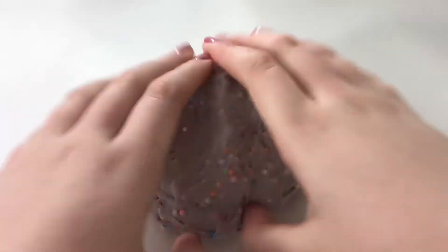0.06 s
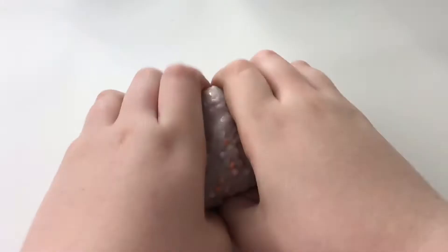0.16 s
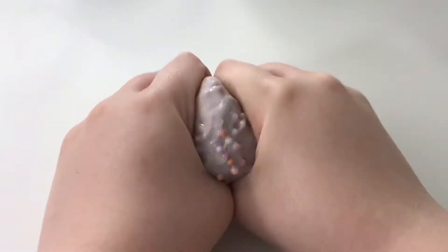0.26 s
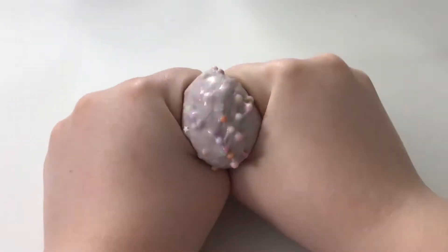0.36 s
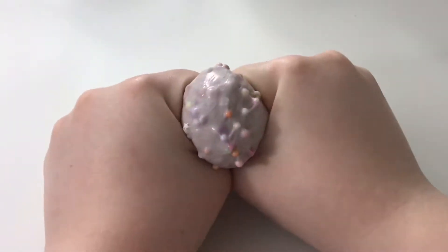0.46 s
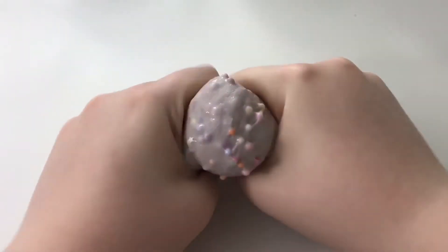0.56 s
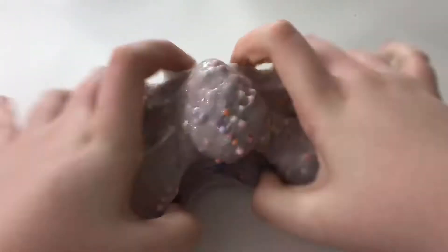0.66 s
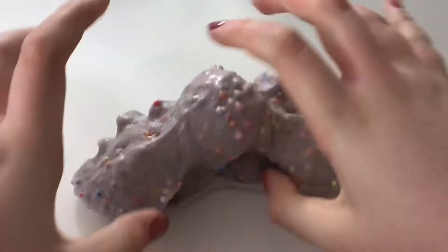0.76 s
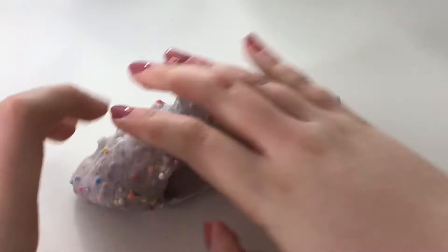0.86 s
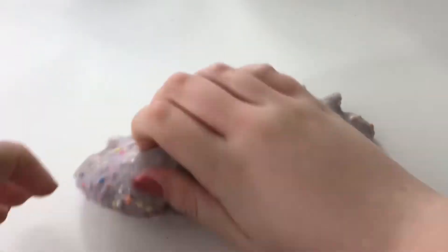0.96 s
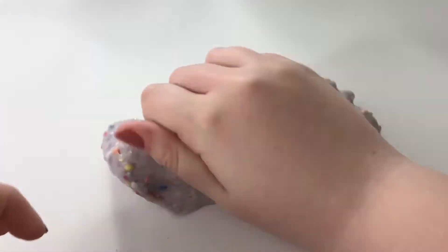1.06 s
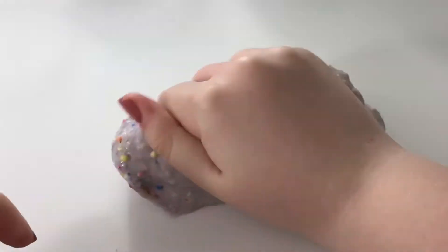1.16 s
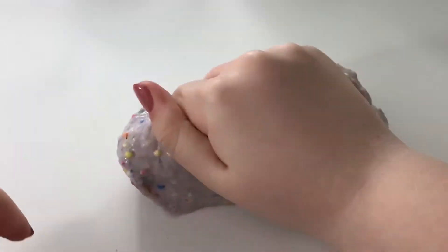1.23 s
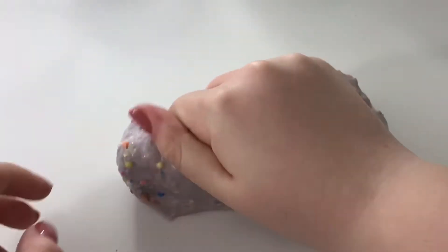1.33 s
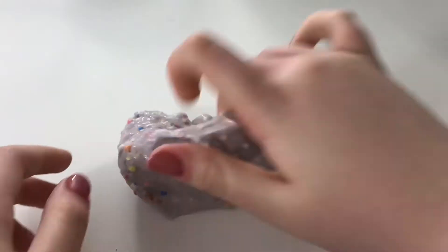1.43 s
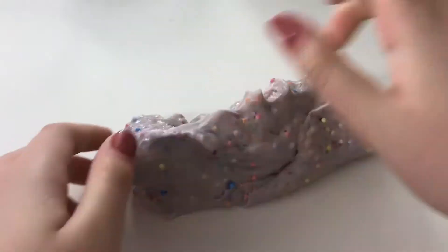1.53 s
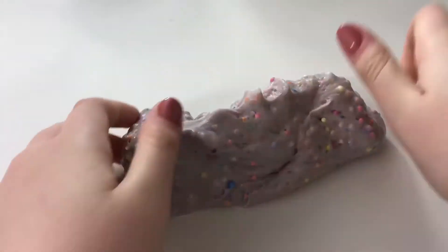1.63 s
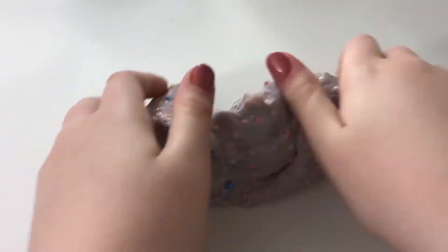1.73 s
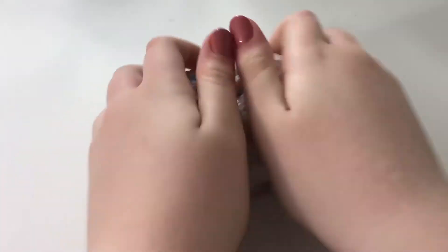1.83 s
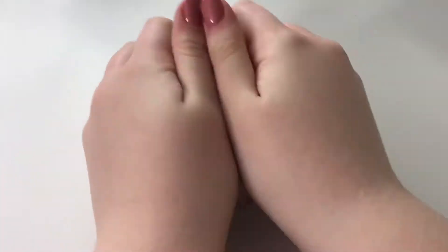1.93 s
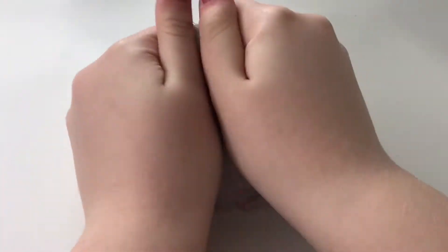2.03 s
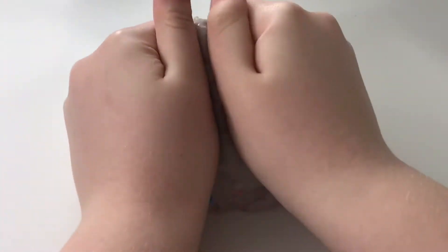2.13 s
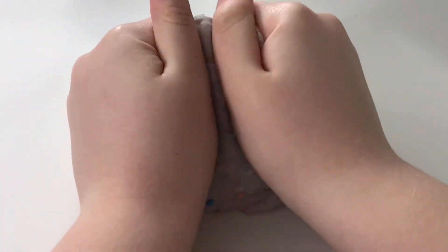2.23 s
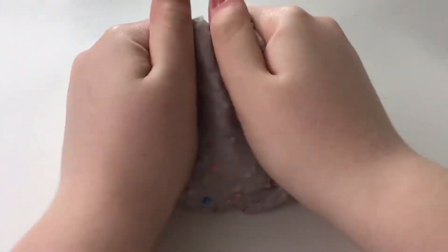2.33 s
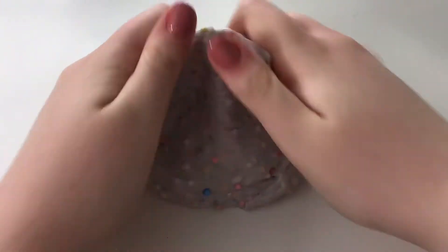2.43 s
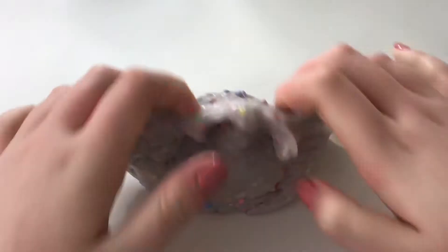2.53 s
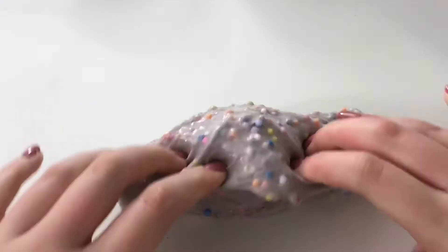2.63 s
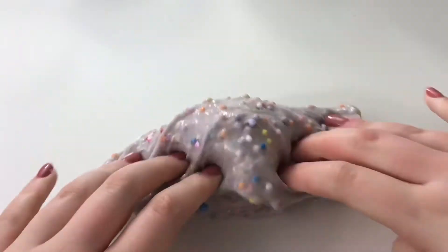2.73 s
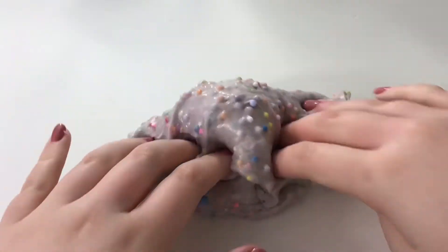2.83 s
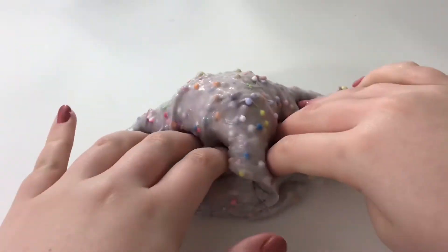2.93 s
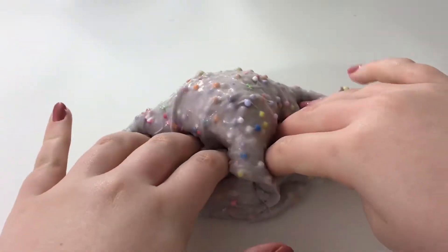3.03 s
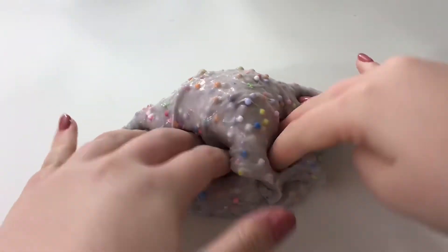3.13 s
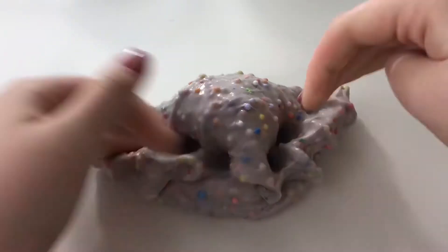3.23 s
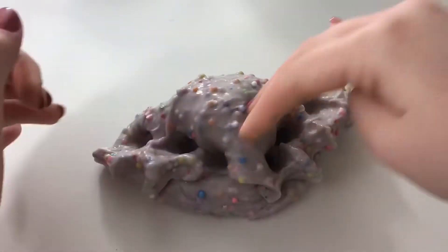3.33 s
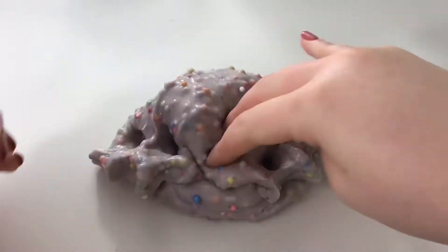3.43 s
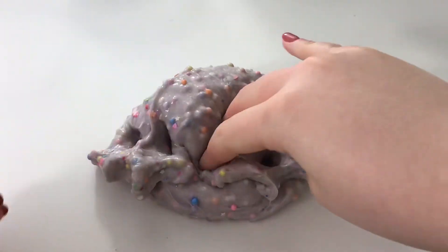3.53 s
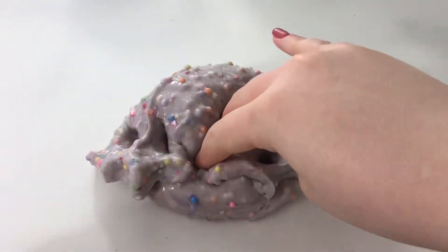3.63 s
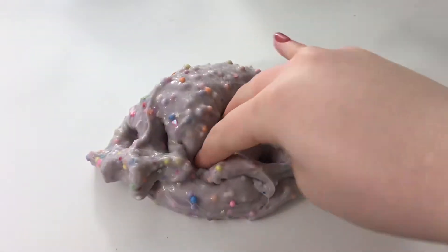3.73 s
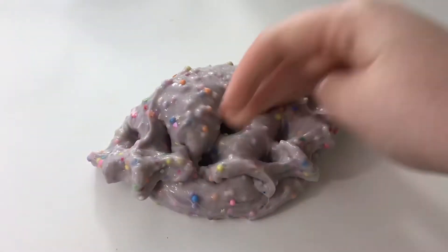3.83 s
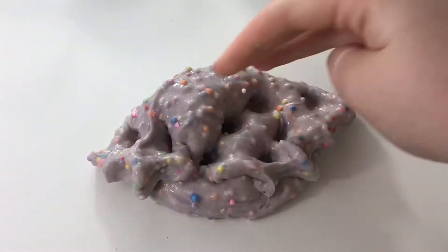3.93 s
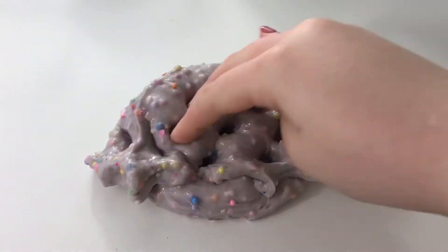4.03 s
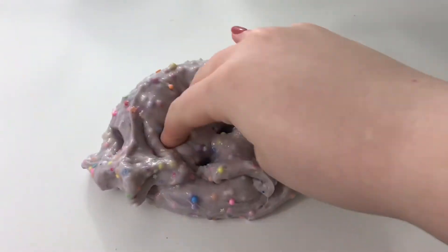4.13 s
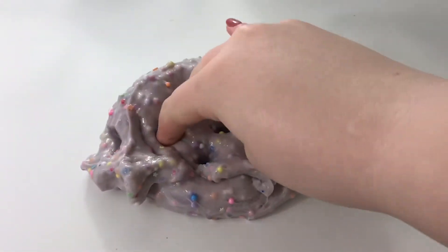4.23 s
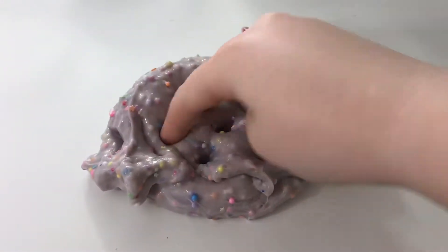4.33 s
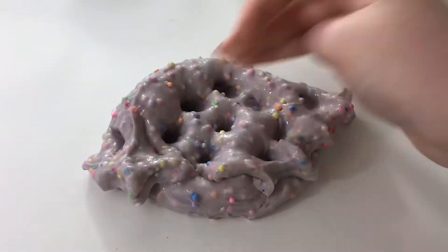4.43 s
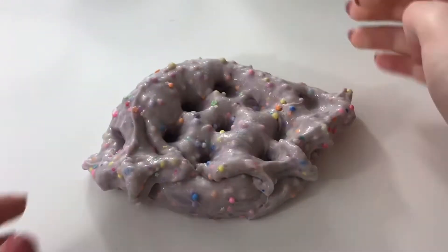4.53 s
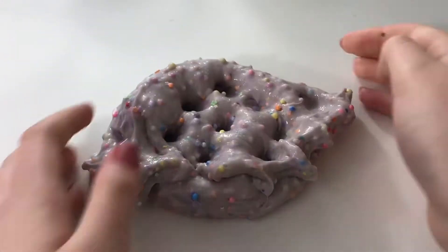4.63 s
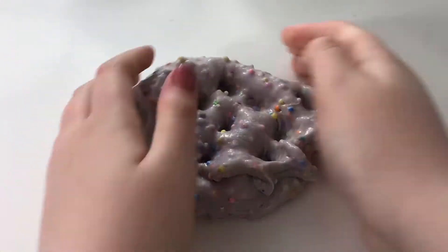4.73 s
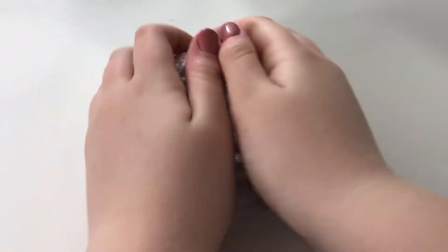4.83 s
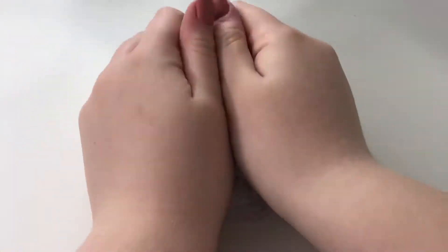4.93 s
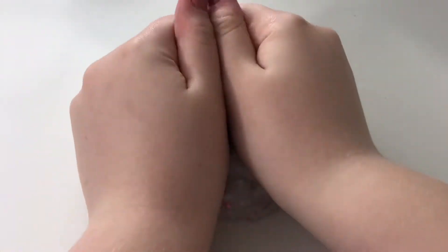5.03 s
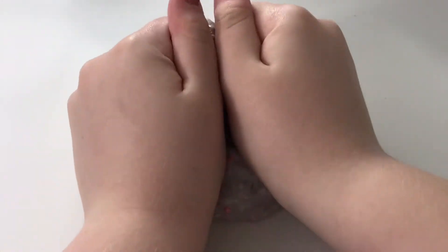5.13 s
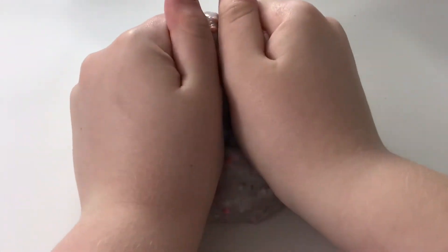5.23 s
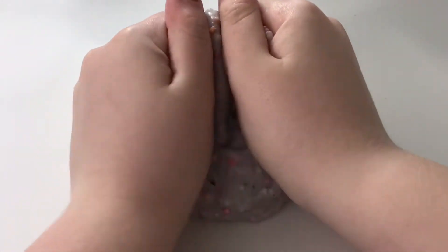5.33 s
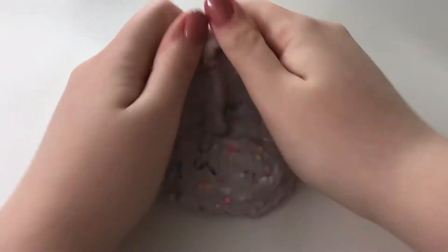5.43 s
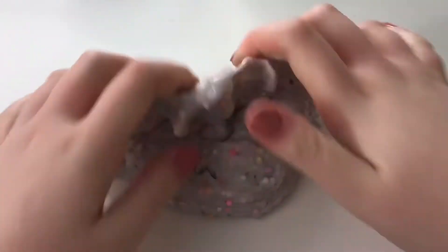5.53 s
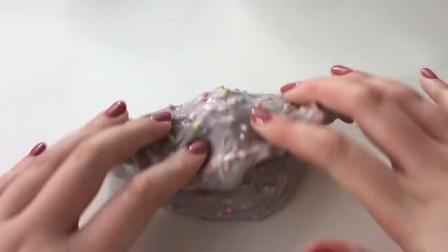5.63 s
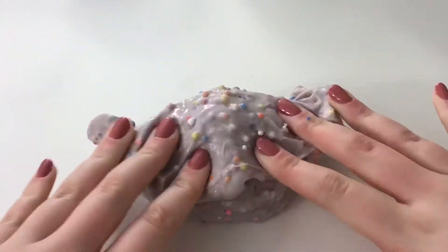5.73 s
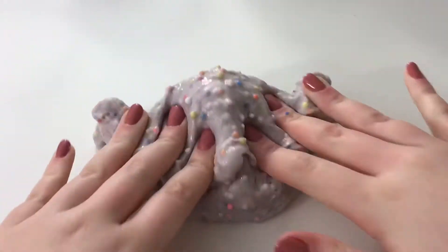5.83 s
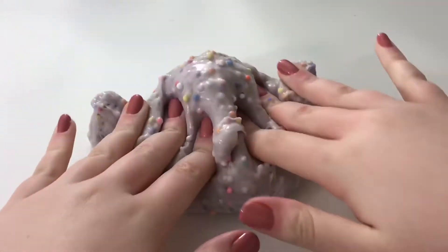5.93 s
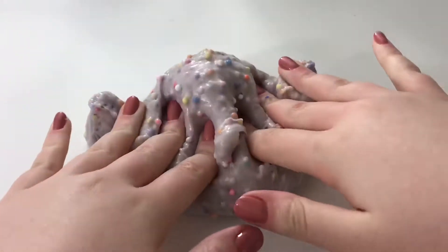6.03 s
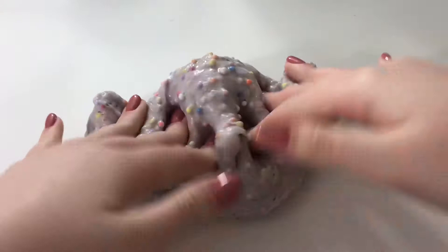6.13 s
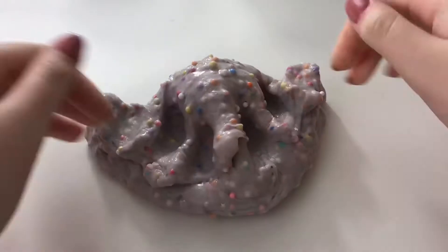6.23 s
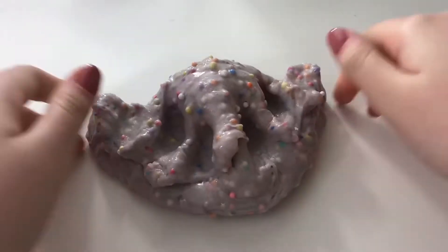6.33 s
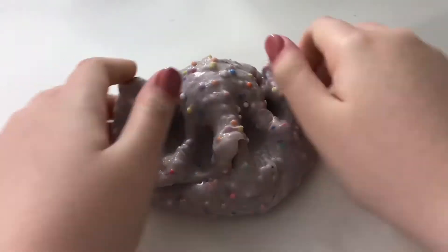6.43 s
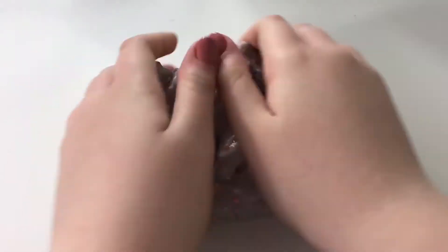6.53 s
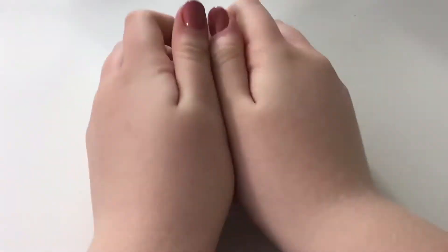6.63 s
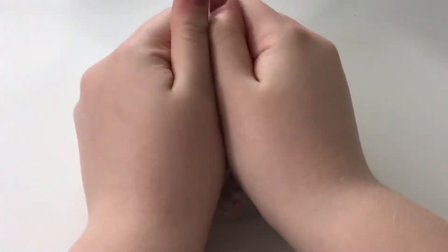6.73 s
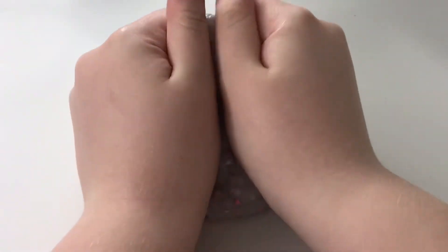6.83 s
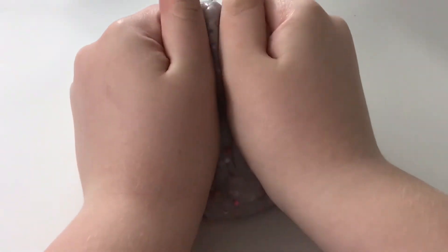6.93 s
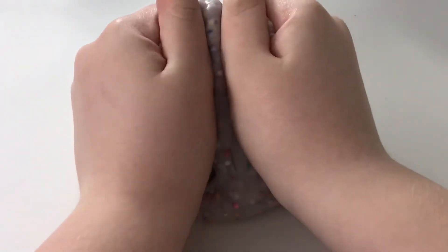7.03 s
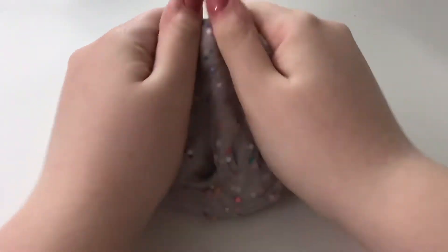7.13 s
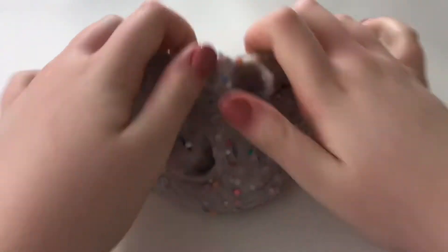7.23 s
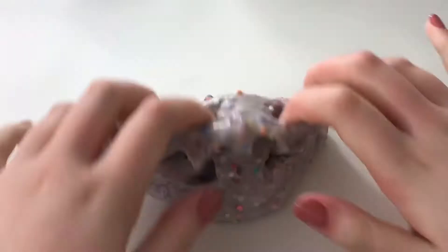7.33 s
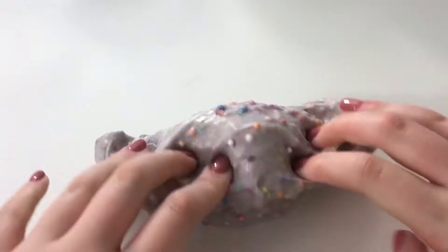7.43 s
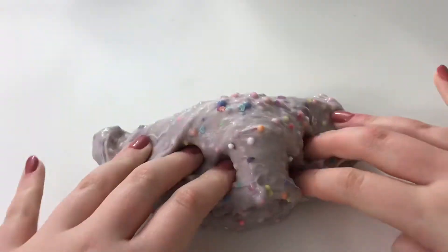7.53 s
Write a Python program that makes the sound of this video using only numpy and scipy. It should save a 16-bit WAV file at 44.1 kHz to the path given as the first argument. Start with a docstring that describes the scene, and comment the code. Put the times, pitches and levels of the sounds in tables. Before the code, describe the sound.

Very close to the microphone in a small quiet room, hands squeeze bead-filled slime. Pressure crackles build into a loud rush of snapping air pockets, followed by sticky peeling and a tiny high squeak. A second squeeze bursts, then fingers poke holes with wet clicks and short rising plops. Two more squeezes break sharply, with soft table thuds and a faint low rumble beneath.

```python
"""Hands rest in foam-bead slime on a table, close by in a small room; bubbles crackle, resonant air pockets pop.
A first squeeze soon breaks into a rush of pops, a pinhole squeaks at 1.2 s and a second squeeze breaks at 2.2 s.
Finger holes, short rising tones, plop mostly between 3.2 and 4.5 s; two more squeezes break at 5.2 and 6.9 s.
Throughout, filtered noise makes soft table thuds, rumble and hiss, a sine hums, and decaying noise echoes."""
import sys
import numpy as np
from scipy import signal
from scipy.fft import rfft, irfft, next_fast_len
from scipy.io import wavfile
from scipy.ndimage import uniform_filter1d

SR = 44100
rng = np.random.default_rng(int(sys.argv[2]) if len(sys.argv) > 2 else 0)


def output_pcm(signal):
    """Save a mono or channel-first signal as 16-bit PCM at the path in sys.argv[1].

    Samples are clipped to [-1, 1] before scaling.
    """
    pcm = np.clip(np.atleast_2d(signal).T, -1, 1) * 32767
    wavfile.write(sys.argv[1], SR, np.round(pcm).astype(np.int16))


N = 333837
T = np.arange(N) / SR

# air pockets heard bursting one by one, loud and faint: (time [s], energy before colouring [dB],
# cavity pitch [Hz], ring of the lump re cavity [dB], tearing time before the linger factor [s])
POCKET_BURSTS = [(0.1923, -23.5, 3850, 3, .002), (0.2288, -18, 3930, -2.5, .0026),
                 (0.2764, -16, 5370, -28, 0.00034), (0.3264, -13, 8000, 1, .0006),
                 (0.375, -10.5, 2800, 16, .001), (0.41, -8.5, 2920, -21, .001), (0.425, 8, 6800, -5, .0013),
                 (0.4504, -4, 14000, -21, .0004), (0.486, 2.5, 15000, -27, .0003),
                 (0.6526, -13.5, 3260, -26, .001), (0.7221, -13.5, 4490, 1.5, .0007),
                 (1.0188, -33, 2520, 7, 0.00078), (1.139, -26.5, 4240, -2, .0004),
                 (1.2615, -14.5, 3300, -29, 0.00091), (1.293, -10, 12800, -30, .001),
                 (1.4559, -20, 3540, 0, 0.0033), (1.5524, -19, 13000, -26, .0008),
                 (1.7913, -24, 3160, -8, 0.0009), (1.819, -25, 5000, 4, 0.0008),
                 (2.0988, -23, 6530, -9, 0.00066), (2.1182, -11, 8450, -13, .0015),
                 (2.1565, 5, 10500, -34.5, .0023), (2.1685, 5.5, 7000, -15, .001),
                 (2.2135, -3, 7530, -6, .0005), (2.2318, -8, 5990, -23, .0018),
                 (2.2537, -5.5, 13000, -1.5, .0016), (2.309, -16.5, 4470, 5, 0.00057),
                 (2.3404, -2.5, 5920, -4, .0026), (2.6816, -15, 8400, -24, .0009),
                 (2.849, -26.5, 11970, -16.5, .001), (2.9364, -27, 8860, -15.5, 0.0006),
                 (2.9636, -31.5, 5300, -7, 0.0004), (3.2268, -18.5, 5370, -16, .002),
                 (3.2373, -18, 4960, -19, .0004), (3.2983, -15.5, 2840, -25, .0008),
                 (3.2545, -13, 6550, -29, 0.00027), (3.273, -12.5, 6660, -28, .001),
                 (3.3105, -9.5, 5430, -19, 0.00019), (3.4437, -33, 14000, -32, .0002),
                 (3.4925, -12.5, 6700, -14.5, 0.00056), (3.6108, -27, 10040, -22.5, .0002),
                 (3.871, -6, 9800, -23, 0.00039), (3.8747, -5, 6500, -11, 0.00042),
                 (3.894, -10.5, 3230, -30, .001), (4.157, -29.5, 4700, -6, 0.00073),
                 (4.2104, -23, 11260, -17, .0001), (4.4425, -6.5, 9000, -7, 0.0014),
                 (4.4639, -9.5, 3470, -28, 0.0004), (4.4914, -19.5, 5000, 2, 0.0004),
                 (4.8367, -22, 3020, -14.5, 0.00088), (4.8603, -20.5, 4260, 0, 0.00047),
                 (5.1035, -14.5, 8100, 4, 0.00049), (5.123, -14, 2000, 1.5, .0008),
                 (5.161, 4, 4030, -3.5, .001), (5.2054, -2.6, 3870, -16, .0012),
                 (5.2337, 1.5, 11920, -21, .0003), (5.2434, -2, 5990, -0.5, .0018),
                 (5.28, 4.5, 3920, -3.5, .0015), (5.2674, -6, 11900, -14, 0.00073),
                 (5.315, 0.5, 11030, -20, .0007), (5.8605, -35, 3250, -15, 0.00055),
                 (5.9264, -22, 9500, -14, .0003), (5.972, -24.5, 11920, -22, .0003),
                 (6.0055, -25.5, 6000, -3.5, .0003), (6.203, -23.5, 5800, -25, 0.0024),
                 (6.2395, -10.5, 8800, -28, 0.00033), (6.4193, -25.5, 3660, 1.5, .0012),
                 (6.495, -25, 7500, -13, .001), (6.874, -19, 2370, 28, 0.00097),
                 (6.8963, -16, 13000, -17, 0.0013), (6.9308, -3, 4580, -6.5, .0006),
                 (6.9385, 9, 8450, -20.5, .0012), (6.9804, 1, 11920, -30, .0004),
                 (7.0333, -4.5, 12500, -29, 0.00017), (7.0707, -11, 12600, -30, 0.0013),
                 (7.1063, 3, 9850, -48, .0003), (7.178, -13, 11260, -33, .0002),
                 (7.54, -17, 3600, -1, 0.00042)]
# small bursts radiate little bass: (frequency [Hz], gain [dB])
POP_COLOUR = [(200, -13), (600, 2), (950, -8), (1350, 2.5), (2300, 1.5), (4000, 3), (9000, 0.5), (16000, 3)]
# big, low pockets ring clearly; small, high ones only click
POCKET_HZ = 4000
POCKET_Q, CLICK_Q, Q_FALL = 1.3, 1.3, 2.6  # extra Q at POCKET_HZ, least Q, how steeply the extra Q falls with pitch
MOST_Q = 5.5

# both fists squeeze until the air breaks out: (grip [s], break [s], rush length [s], strain level [dB],
# rush level [dB], fizz re rush [dB], fade [dB/s]); levels here and below are before the trims in kneading()
SQUEEZES = [(0.275, 0.423, 0.0096, -44.5, -34, 1, 162), (1.85, 2.162, 0.088, -60, -42, 6, 130),
            (4.903, 5.166, .16, -51, -43.5, -1, 122), (6.695, 6.93, 0.01, -58, -46, 9.5, 44)]
STRAIN_DB_PER_S = 39  # the crackle grows as the pressure builds
BREAK_DB_PER_S = 3997.5  # the rush starts at once
STRAIN_FIZZ_DB, SQUEEZE_SQUELCH_DB = -1, -13.5
# slime peels off fingers or table: (start [s], length [s], crackle level [dB], squelch re crackle [dB],
# fizz re crackle [dB])
PEELS = [(0, 0.014, -58, -2, -1), (0.657, 0.087, -39.5, -5, -5.5), (0.809, 0.05, -59, -2, 2),
         (1.045, 0.045, -65, -2, 8), (1.216, 0.052, -51.5, -20, 2.5), (1.442, 0.098, -44, -9, -5.5),
         (1.817, 0.043, -53.5, -6.5, -4), (2.343, 0.057, -45, -9, 0), (2.453, 0.074, -46.5, -9.5, 1),
         (2.559, 0.097, -55.5, -9, 1.5), (3.495, 0.032, -64, -2, 1.5), (4.14, 0.079, -70.5, 5.5, -3),
         (4.755, 0.026, -57, -7.5, -3), (5.003, 0.0078, -47, -7.5, 1.5), (5.485, 0.046, -42.5, -7.5, 0.5),
         (5.556, 0.057, -52, -5.5, -0.5), (6.217, 0.061, -51.5, -1, 3.5), (6.427, 0.0088, -58.5, 0.5, -14),
         (6.51, 0.02, -53.5, -3.5, 2.5), (6.578, 0.085, -56, -4.5, -0.5), (6.792, 0.14, -68, 3.5, 13),
         (7.205, 0.068, -48.5, -3.5, 6)]
PEEL_RISE_DB_PER_S, PEEL_SAG_DB_PER_S, PEEL_FADE_DB_PER_S = 799.5, 28, 328.5
# a finger hole is pulled open or squeezed shut: (start [s], length [s], crackle level [dB],
# squelch re crackle [dB], fizz re crackle [dB])
PULLS = [(3.248, 0.063, -47.5, 6, 4), (3.879, 0.042, -49.5, 1.5, -1), (4.464, 0.031, -53.5, 6, -10.5),
         (4.803, 0.098, -52.5, -4.5, 0.5)]
HOLE_DB = -1.5  # the narrow neck of the hole rings, re crackle
# hands resting in the slime keep up a faint tacky crackle: (start [s], end [s], level [dB])
TOUCHES = [(0, 0.853, -68.5), (1.044, 2.745, -68.5), (4.582, 5.72, -67), (6.509, 7.57, -67)]
TOUCH_SQUELCH_DB, TOUCH_FIZZ_DB, TOUCH_FADE_DB_PER_S = -1.5, -1, 182
FIZZ_POWER = 1.42  # tiny bubbles start last and stop first

# colour of the middle-sized bubbles: (frequency [Hz], gain [dB])
CRACKLE_COLOUR = [(500, -22), (1000, -9.5), (1400, -2.5), (1800, -4.5), (2400, -6), (3100, -4.5),
                  (3900, -3), (5200, -6.5), (6500, -8), (9000, -15)]
# colour of the large bubbles: (frequency [Hz], gain [dB])
SQUELCH_COLOUR = [(150, -31), (320, -3), (500, -5.5), (800, -5.5), (1150, 1), (1500, -8), (2500, -35)]
# colour of the tiny bubbles: (frequency [Hz], gain [dB])
FIZZ_COLOUR = [(3500, -47), (5500, 2), (7000, -2), (9300, 0.5), (10500, -7), (12000, 0.5), (15500, 1),
               (16500, -22.5)]
# colour of the bubbles in the neck of a finger hole: (frequency [Hz], gain [dB])
HOLE_COLOUR = [(1700, -23), (2600, 4), (3300, -4), (4300, -23)]

# air rushing into a finger hole: (time [s], energy [dB], starting pitch [Hz], ring time, to e^-6 [s])
HOLE_PLOPS = [(3.255, -17, 850, 0.0036), (3.297, -16.5, 574, 0.0083), (3.31, -18.5, 368, 0.013),
              (3.3107, -13, 3020, 0.003), (3.347, -24.5, 980, 0.0023), (3.8759, -8, 840, 0.0037),
              (3.885, -27, 770, 0.013), (4.444, -13.5, 740, 0.0051), (4.453, -20.5, 907, 0.015),
              (2.214, -14.5, 626, 0.0048), (2.271, -24.5, 513, 0.0026), (2.683, -24.5, 1120, 0.0033),
              (0.727, -22, 1190, 0.0078)]
# air squeaking out through a pinhole: (time [s], mean pitch [Hz], level [dB])
SQUEAK = [(1.205, 12600, -76), (1.218, 11500, -40), (1.224, 13900, -45), (1.230, 12500, -42),
          (1.236, 14000, -28), (1.242, 15200, -52)]
# hands pressing on the table: (time of the peak [s], level [dB])
THUDS = [(0.233, -53.5), (.79, -48), (1.072, -57), (1.868, -53), (3.017, -50.5), (3.333, -56.5),
         (3.882, -69), (4.187, -53.5), (4.93, -49.5), (5.542, -59)]

# reverberation time of the room: (frequency [Hz], t60 [s])
ROOM_T60 = [(300, .26), (1300, .3), (4000, .29), (9000, .27), (16000, .2)]
# colour of the reverberation: (frequency [Hz], gain [dB])
ROOM_COLOUR = [(300, 5), (900, 2), (1400, 1.5), (2400, 3.5), (4200, 4), (7000, 2), (9300, 5.5), (10500, -3),
               (12500, 4), (16000, -4)]
# the low rumble: (time [s], level of the deep rumble near 45 Hz [dB], level of the drone near 75 Hz [dB])
RUMBLE = [(0, -59, -69), (.2, -52, -61), (.41, -43.5, -82), (.68, -61, -60), (1.4, -61.5, -62.5),
          (2, -59, -65.5), (3.3, -56.5, -55), (4.35, -60, -60), (4.8, -59.5, -65.5), (5.6, -65.5, -66),
          (7.57, -69, -72)]
# colour of the room's hiss: (frequency [Hz], gain [dB])
AIR_COLOUR = [(20, 2), (50, -2.5), (100, -7), (160, 3), (230, 5.5), (300, -0.5), (420, -9.5), (800, -12.5),
              (2000, -16), (5000, -21), (10000, -26.5), (16000, -23)]
EDGE_HZ = 16050  # upper band limit


def pops(rows, snap_db=-14, lump_hz=1420, lump_q=1.6, grit=0.26, linger=1.3, reshape_octaves=.12,
         dry_db=-11, deep_s=.0008):
    """Impulse-excited cavity resonance, with the hollow between lump and hands; returns (direct, sent to room)."""
    out, sent, t = np.zeros(N), np.zeros(N), np.arange(512) / SR
    for s, db, hz, lump_db, seconds in rows:
        q = min(CLICK_Q + POCKET_Q * (POCKET_HZ / hz) ** Q_FALL, MOST_Q)
        push = tear(t, seconds * linger, grit)
        cavity = ring(push, hz, q)
        hollow = ring(push, lump_hz * 2 ** (reshape_octaves * rng.standard_normal()), lump_q)
        blend = unit(cavity) + amp(lump_db) * unit(hollow) + amp(snap_db) * unit(push)
        burst = amp(db) * unit(blend)
        add(out, s, burst)
        # brief snaps on the near surface stay dry
        add(sent, s, amp(dry_db * max(1 - seconds / deep_s, 0)) * burst)
    return colour(out, POP_COLOUR), colour(sent, POP_COLOUR)


def tear(t, seconds, grit):
    """Rupture of a film: an impulse, then exponentially dying smaller snaps."""
    snaps = rng.standard_normal(len(t)) * (rng.random(len(t)) < .45)
    push = grit * snaps * np.exp(-t / max(seconds, 1e-5))
    push[:2] = 1, 0
    return np.roll(push, shift=round(SR / 4000))


def small_pops(work, per_s=45, above_db=26, ceiling_db=-47, spread_db=0.8, hz=4300, lump_db=-6, seconds=0.0005):
    """Random failure of further air pockets, louder with harder work up to a ceiling; rows as in POCKET_BURSTS."""
    chance, size, pitch, place, shape = rng.random((1500, 5)).T
    s = place * T[-1]
    db = np.minimum(20 * np.log10(np.interp(s, T, work)), ceiling_db) + above_db
    db = db - spread_db * np.log(np.maximum(size, .1))  # most are small, a few stand out
    pocket_hz = hz * 2 ** (2 * pitch - 1)  # within an octave either way
    rows = np.transpose([s, db, pocket_hz, np.full_like(s, lump_db), 2 * seconds * shape])
    return rows[chance < per_s * T[-1] / len(s)]


def kneading(middle, large, tiny, crackle_db=-1, squelch_db=-1, fizz_db=-1):
    """Adhesive peeling as superposed bubble noise: the smaller the bubbles, the higher they ring."""
    crackle = bubbles(per_s=2200, spread_db=1.5, low_hz=1220, high_hz=6860, q=4.1, clump_db=2, points=CRACKLE_COLOUR)
    squelch = bubbles(per_s=1200, spread_db=3.5, low_hz=319.8, high_hz=1520, q=1.4, clump_db=4.5,
                      points=SQUELCH_COLOUR)
    fizz = bubbles(per_s=8100, spread_db=4.0, low_hz=5500, high_hz=15040, q=2.5, clump_db=0.0, points=FIZZ_COLOUR)
    return amp(crackle_db) * middle * crackle + amp(squelch_db) * large * squelch + amp(fizz_db) * tiny * fizz


def bubbles(per_s, spread_db, low_hz, high_hz, q, clump_db, points, count=14):
    """Shot noise through resonators: random clicks ring bubbles of like pitch in clumps; level held even."""
    out = np.zeros(N)
    for hz in np.geomspace(low_hz, high_hz, count):
        size = amp(spread_db * np.minimum(rng.exponential(1, N), 4) + clump_db * wander(.009))
        bursting = rng.random(N) < per_s / count / SR
        clicks = size * np.sign(rng.standard_normal(N)) * bursting
        b, a = signal.iirpeak(min(hz, SR / 2.5), max(q, 1), fs=SR)
        out += signal.lfilter(b, a, clicks)
    out = colour(out, points)
    return out / np.sqrt(abs(uniform_filter1d(out ** 2, size=1800)) + 1e-12)


def handwork():
    """Powers of independent sources add: gain curves for middle, large and tiny bubbles, and the finger holes."""
    moves = []  # (level dB, shape, squelch dB, fizz dB)
    for grip, burst, length, strain_db, rush_db, fizz_db, fade in SQUEEZES:
        held = gesture(grip, burst, PEEL_RISE_DB_PER_S, 0, PEEL_FADE_DB_PER_S)
        pressure = amp(STRAIN_DB_PER_S * np.minimum(T - burst, 0)) * held
        rush = gesture(burst, burst + length, BREAK_DB_PER_S, 0, fade)
        moves.append((strain_db, pressure, SQUEEZE_SQUELCH_DB, STRAIN_FIZZ_DB))
        moves.append((rush_db, rush, SQUEEZE_SQUELCH_DB, fizz_db))
    for s, length, db, squelch_db, fizz_db in PEELS + PULLS:
        moves.append((db, peel(s, length), squelch_db, fizz_db))
    for start, end, db in TOUCHES:
        touch = gesture(start, end, TOUCH_FADE_DB_PER_S, 0, TOUCH_FADE_DB_PER_S)
        moves.append((db, touch, TOUCH_SQUELCH_DB, TOUCH_FIZZ_DB))
    power = np.zeros((3, N))
    for db, shape, squelch_db, fizz_db in moves:
        gains = [amp(db) * shape, amp(db + squelch_db) * shape, amp(db + fizz_db) * shape ** FIZZ_POWER]
        power += np.array(gains) ** 2
    hole = sum(amp(db + HOLE_DB) * peel(s, length) for s, length, db, *_ in PULLS)
    return (*np.sqrt(power), hole)


def peel(start, length):
    """Loss of adhesion from a surface: a quick swell, a slow sag, a quick end."""
    return gesture(start, start + length, PEEL_RISE_DB_PER_S, PEEL_SAG_DB_PER_S, PEEL_FADE_DB_PER_S)


def gesture(start, end, rise, sag, fade):
    """Exponential growth and decay: attack up to start, sagging hold and release; slopes in dB per second."""
    attack = -rise * np.maximum(start - T, 0)
    hold = -sag * np.clip(T - start, 0, max(end - start, 0))
    release = -fade * np.maximum(T - end, 0)
    return amp(np.maximum(attack + hold + release, -200))


def sucking(hole):
    """Neck resonance: bubbles bursting in a finger hole ring in a narrow band."""
    return hole * bubbles(per_s=600, spread_db=6, low_hz=2300, high_hz=3500, q=6, clump_db=2,
                          points=HOLE_COLOUR, count=5)


def plops(rise=0.082):
    """Resonance of a changing cavity: a finger hole rings briefly, its pitch rising as it opens."""
    out, t = np.zeros(N), np.arange(3000) / SR
    for s, db, hz, seconds in HOLE_PLOPS:
        turns = np.cumsum(hz * (1 + rise * np.minimum(t / seconds, 1))) / SR
        swell = t * np.exp(-6 * t / seconds)
        add(out, s, amp(db) * unit(swell * np.sin(2 * np.pi * turns)))
    return out


def squeak(waver=0.03):
    """Whistle of air escaping through a pinhole: a sine whose frequency wavers at random."""
    hz, db = curves(SQUEAK)
    wobble = evened(uniform_filter1d(rng.standard_normal(N), size=25))
    whistle = np.sin(2 * np.pi * np.cumsum(hz * (1 + waver * wobble)) / SR)
    sounding = (T > SQUEAK[0][0]) & (T < SQUEAK[-1][0])
    return sounding * amp(db) * evened(whistle)


def thuds(table_hz=225, q=1.9, seconds=0.0096):
    """Forced plate resonance: soft pushes through the slime set the table top drumming."""
    out, t = np.zeros(N), np.arange(SR // 5) / SR
    swell = (t / seconds / 2) ** 2 * np.exp(2 - t / seconds)  # peaks at 1 after 2 * seconds
    for s, db in THUDS:
        drum = evened(ring(ring(rng.standard_normal(len(t)), table_hz, q), table_hz, q))
        add(out, s - 2 * seconds, amp(db) * drum * swell)
    return out


def room(x, count=5):
    """Diffuse reverberation: five random echo patterns crossfade in a fixed cycle, which keeps the tail smooth."""
    out = np.zeros(N)
    for k in range(count):
        away = abs((T / .037 - k) % count - count / 2)
        share = np.cos(np.pi / 2 * np.minimum(away, 1))  # equal-power crossfade
        out += signal.fftconvolve(x * share, echo(near_db=-6, near_s=0.0031, tail_db=-10.5))[:N]
    return out


def echo(near_db, near_s, tail_db):
    """Early reflections off hands and table, then exponential reverberant decay, each from sparse noise."""
    t = np.arange(SR // 2) / SR
    a, b, chance = rng.standard_normal((3, len(t)))
    near = unit(a * (chance > 1) * (t > .0012) * np.exp(-t / near_s))
    hz, s, z = signal.stft(b * (chance < -1), SR, nperseg=256)
    decay = amp(-60 * s / read(ROOM_T60, hz)[:, None])
    tail = signal.istft(z * decay, SR, nperseg=256)[1][:len(t)]
    tail = unit(tail * np.clip(t / 0.00204 - 1, 0, 1))  # fades in from 2 to 4 ms
    return colour(amp(near_db) * near + amp(tail_db) * tail, ROOM_COLOUR)


def background(air_db=-63.0, hum_hz=120, hum_db=-65.5, waver_db=3.0, deep_hz=45, deep_q=4, drone_hz=75, drone_q=9):
    """Ambient noise: even coloured hiss, a wavering mains hum and two rumbles that swell and sink."""
    deep_db, drone_db = curves(RUMBLE)
    a, b, c = rng.standard_normal((3, N))
    deep = amp(deep_db) * evened(ring(ring(a, deep_hz, deep_q), deep_hz, deep_q))
    drone = amp(drone_db) * evened(ring(ring(b, drone_hz, drone_q), drone_hz, drone_q))
    hum = amp(hum_db + waver_db * wander(0.097)) * evened(np.sin(2 * np.pi * hum_hz * T))
    hiss = amp(air_db) * evened(colour(c, AIR_COLOUR))
    return deep + drone + hum + hiss


def ring(x, hz, q):
    """Damped resonance with sharpness q."""
    size = next_fast_len(2 * len(x))
    f = np.fft.rfftfreq(size, 1 / SR) + 1e-6
    return irfft(rfft(x, size) / (1 + 1j * q * (f / hz - hz / f)), size)[:len(x)]


def colour(x, points, size=2048):
    """Minimum-phase filtering to a given spectrum: causal, so clicks keep a sharp front."""
    log_gain = np.log(amp(read(points, abs(np.fft.fftfreq(size, 1 / SR)))))
    taps = np.fft.ifft(np.exp(np.conj(signal.hilbert(log_gain)))).real
    return signal.oaconvolve(x, taps[:size // 2])[:len(x)]


def wander(seconds):
    """Random modulation: a piecewise linear curve of rms 1 with a new target every so many seconds."""
    steps = np.arange(0, T[-1] + seconds, seconds)
    return evened(np.interp(T, steps, rng.standard_normal(len(steps))))


def read(points, hz):
    """Interpolation of a spectrum on a log-frequency axis."""
    f, value = np.transpose(points)
    return np.interp(np.log(hz + 1), np.log(f + 1), value)


def curves(rows):
    """Linear interpolation of each column of a table over the whole time."""
    s, *columns = np.transpose(rows)
    return [np.interp(T, s, c) for c in columns]


def add(mix, s, sound):
    """Superposition: mixes a sound in at time s."""
    part = mix[max(round(s * SR), 0):][:len(sound)]
    part += sound[:len(part)]


def amp(db):
    """Amplitude ratio of a level in decibels."""
    return 10 ** (np.asarray(db) / 20)


def evened(x):
    """Normalisation to rms 1."""
    return x / np.sqrt(np.mean(x ** 2) + 1e-20)


def unit(x):
    """Normalisation to energy 1."""
    return x / np.sqrt(np.sum(x ** 2) + 1e-20)


def scene(crackle_room_db=-5):
    """Superposition of direct and reflected sound: the slime is close, and longer bursts wake the room more."""
    middle, large, tiny, hole = handwork()
    bursts, sent = pops(POCKET_BURSTS)
    random_bursts, _ = pops(small_pops(middle))  # these stay dry
    air = plops() + squeak()
    crackle = kneading(middle, large, tiny) + sucking(hole)
    wet = room(sent + air + amp(crackle_room_db) * crackle)
    return (bursts + air + crackle + wet + thuds() + background() + random_bursts)[None]


def record(dry):
    """Band limiting and clipping: the deepest bass drops, the loudest pops are clipped, the top is cut."""
    x = signal.sosfilt(signal.butter(4, 34, "high", fs=SR, output="sos"), dry)
    low_pass = signal.firwin(255, EDGE_HZ, window=("kaiser", 8), fs=SR)
    return signal.oaconvolve(np.clip(x, -.85, .85), low_pass[None], "same")


dry = scene()
out = record(dry)
output_pcm(out)
```